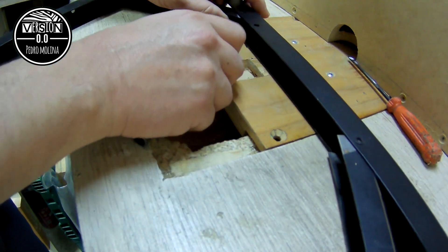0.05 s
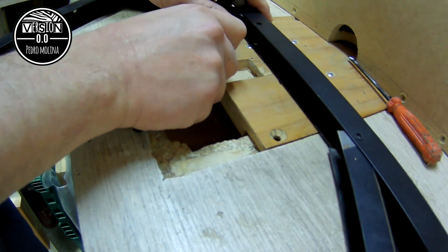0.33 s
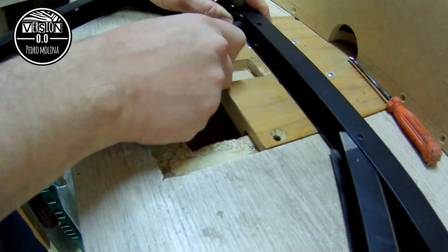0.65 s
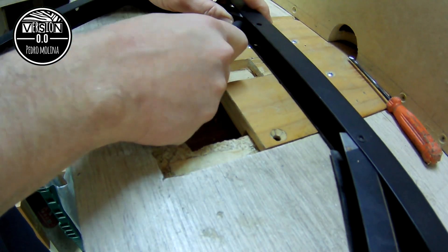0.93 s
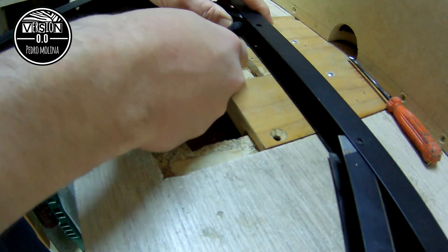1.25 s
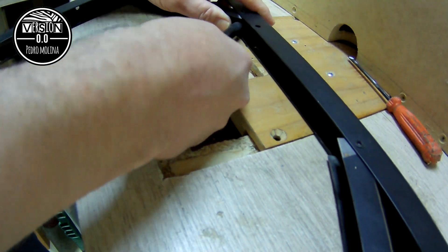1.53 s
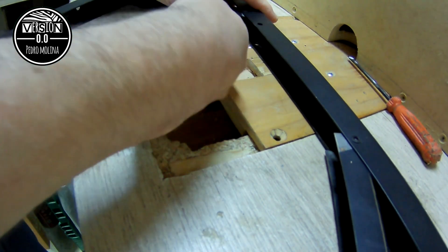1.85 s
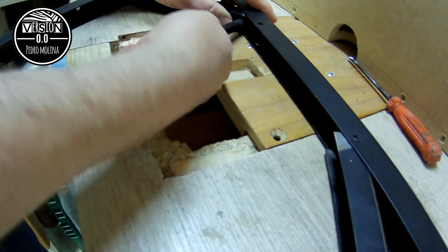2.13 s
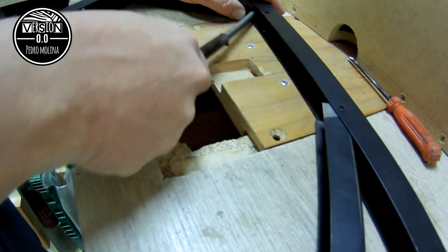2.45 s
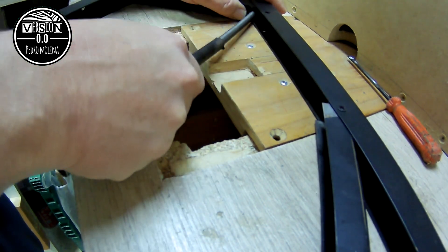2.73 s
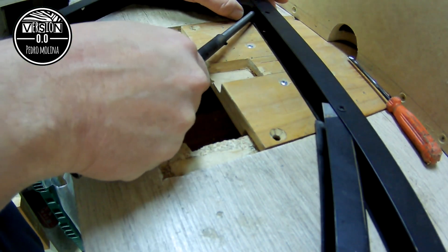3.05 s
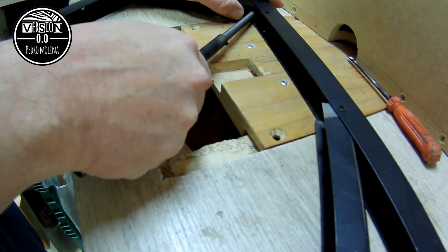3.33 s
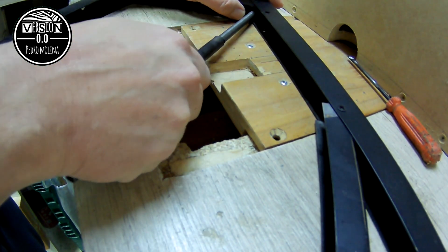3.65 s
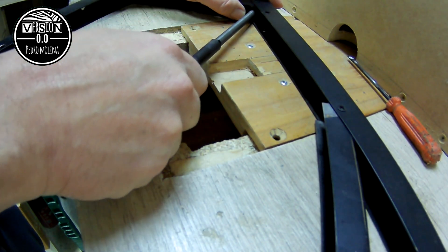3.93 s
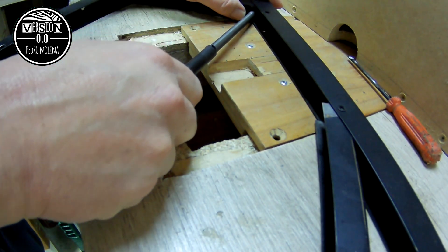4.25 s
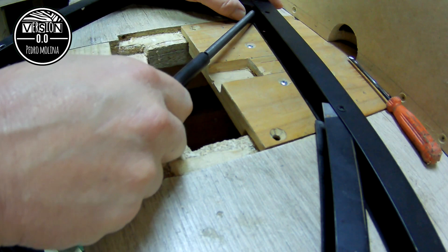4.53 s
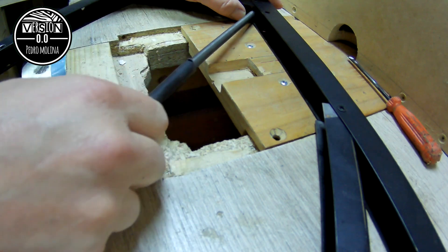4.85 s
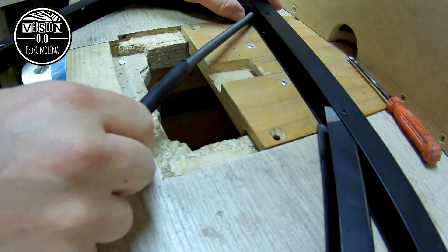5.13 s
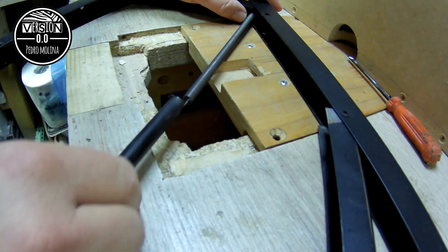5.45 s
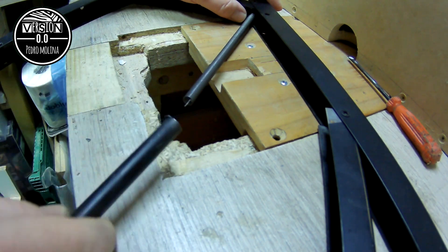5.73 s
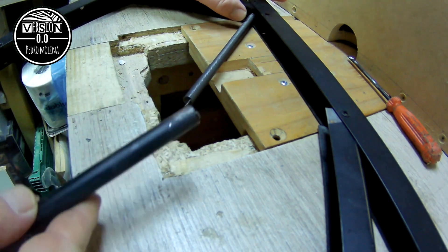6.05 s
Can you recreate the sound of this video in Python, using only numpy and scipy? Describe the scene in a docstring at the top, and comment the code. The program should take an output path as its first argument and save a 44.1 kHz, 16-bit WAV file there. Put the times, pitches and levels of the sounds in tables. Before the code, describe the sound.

The sound is close, in a small workshop with light hiss and a faint electronic buzz throughout. For the first two seconds, hands rub softly on a hollow wooden board, a tight metal joint creaks faintly, and a couple of light knocks follow. At about 2.3 seconds a steel tube slips with a squeaky scrape and, at 2.4, bangs against its stop. This is the loudest sound, with a wooden thud and a ringing steel rod. A smaller clank comes at 2.6, then light scuffs until 3.2. From 3.6 the tube is drawn off in a quiet, rapid judder that grows faster and louder, turning into a gritty rasp with small pings around 4.7 while the board groans low. Between 5.2 and 5.5 the tube's end scrapes and clatters loudly over the tip. The rod rings on and fades by 6 seconds.

```python
"""A small workshop: a steel tube is worked off a rod fixed to a wooden board.
Hands shift on the board; the tube slips with a scrape and bangs against its stop. It is then drawn off
in a stick-slip judder that turns into a rasp while the board groans. Its end clatters over the tip
and leaves the rod ringing. Room air and a faint electronic buzz lie underneath."""
import sys
import numpy as np
from scipy import signal
from scipy.fft import rfft, irfft
from scipy.io import wavfile

SR = 44100
rng = np.random.default_rng(int(sys.argv[2]) if len(sys.argv) > 2 else 0)


def master_out(mix):
    """Clip the mix to full scale and print it as 16-bit PCM to the path in sys.argv[1]."""
    frames = np.transpose(np.atleast_2d(mix))
    ceiling = np.clip(frames, -1, 1)
    pcm = np.round(ceiling * 32767).astype(np.int16)
    wavfile.write(sys.argv[1], SR, pcm)


N = 272752
TIME = np.arange(N) / SR
ROD_FREE_S = 4.0  # tube nearly off from here on
CUTOFF_HZ = 15400
HAND_ATTACK_S = 0.032

# steel-on-steel blows: start_s, clank_db, thud_db, crack_db, ring_db
KNOCKS = [(1.8366, -33, -30.5, -46, -56.5), (2.102, -39, -34, -42, -67.5), (2.334, -17, -32, -13, -65),
          (2.4191, 2.5, 3, -13, -19), (2.437, -38, -8, -37, -75), (2.5906, -11.5, -24, -18.5, -36),
          (2.667, -25, -48, -20.5, -54), (5.216, -34, -35, -22.5, -64.5), (5.3164, -6.5, -20.5, -15.5, -60),
          (5.351, -21, -52, -19.5, -70), (5.3934, -4.5, -14, -19.5, -63.5), (5.43, -29, -21.5, -20, -74.5),
          (5.484, -16, -23, -18, -50), (5.502, -22, -25.5, -29, -50), (5.519, -27, -24.5, -38, -33.5)]
# rod modes, lowest first: pitch_hz, held_db, free_db, held_t60_s
ROD_MODES = [(1325, -12, 0, 1.15), (1416, 0, -9, .58), (1464, -12, -6, .36), (1526, -14, -12, .65),
             (1698, -11.5, -15, 1.1), (1879, -16, -13, .7), (2153, -18, -3, .46), (2440, -11, -12, .6),
             (3289, -17, -7, .44)]
# tube wall squeal spectrum: freq_hz, gain_db
SQUEAL_COLOUR = [(1500, -31.5), (4000, -4.5), (7000, -14), (9000, 6), (10200, -10.5), (14000, -7.5),
                 (15500, -24.5)]


def from_db(db):
    """Decibels to gain."""
    return 10 ** (np.asarray(db) / 20)


def rms_one(x):
    """Scale to unit rms."""
    return x / np.sqrt(np.mean(x ** 2) + 1e-20)


def at_hz(points, hz):
    """Interpolate a table over log frequency."""
    freq_hz, value = np.transpose(points)
    return np.interp(np.log(hz + 1e-9), np.log(freq_hz), value)


def band(x, hz, kind):
    """Second-order Butterworth filter."""
    return signal.sosfilt(signal.butter(2, hz, kind, fs=SR, output="sos"), x + 1e-18)


def add(track, start_s, sound):
    """Mix a sound in at start_s."""
    at = max(0, round(start_s * SR))
    track[at:at + len(sound)] += sound[:N - at]


def coloured(x, colour, peaks=(), size=8192):
    """Minimum-phase filter from a broad colour and resonances; white noise keeps its power."""
    hz = np.arange(size // 2 + 1) * SR / size
    peaks_db = sum(db / (1 + (2 * (hz - centre_hz) / width_hz) ** 2) for centre_hz, width_hz, db in peaks)
    gain = rms_one(from_db(at_hz(colour, hz) + peaks_db))
    cepstrum = irfft(np.log(gain))
    cepstrum[1:size // 2] *= 2
    cepstrum[size // 2 + 1:] = 0
    return signal.fftconvolve(x, irfft(np.exp(rfft(cepstrum))))[:N]


def ring(force, hz, t60_s):
    """One mode: a unit click starts a decaying sine of height 1."""
    r, w = from_db(-60 / (t60_s * SR)), 2 * np.pi * hz / SR
    return signal.lfilter([0, np.sin(w)], [1, -2 * r * np.cos(w), r * r], force + 1e-18)


def burst(t60_s):
    """Decaying noise: many close modes dying together."""
    t = TIME[:int(1.5 * t60_s * SR) + 2]
    return rng.standard_normal(len(t)) * from_db(-60 * t / t60_s)


def grains(per_s, spread_db, flutter_db, flutter_hz):
    """Surface roughness: random micro-impacts under fluttering pressure; rms 1."""
    sizes = from_db(spread_db * np.minimum(rng.exponential(1, N), 4)) * rng.choice([-1, 1], N)
    pressure = rms_one(band(rng.standard_normal(N), flutter_hz, "low"))
    hits = rng.random(N) < per_s / SR
    return rms_one(sizes * hits * from_db(flutter_db * pressure))


def strokes(rows, attack_s=0.0038, release_db_per_s=423.5):
    """Strokes set in, swell or fade, then die as the hand stops; one gain curve per level column."""
    gains = 0
    for start_s, length_s, swell_db_per_s, *levels_db in rows:
        t = TIME - start_s
        shape_db = swell_db_per_s * np.clip(t, 0, length_s) - release_db_per_s * np.maximum(t - length_s, 0)
        shape = np.clip(t / attack_s, 0, 1) * from_db(shape_db)
        gains = gains + np.outer(from_db(levels_db), shape)
    return gains


def jerks(events, snap_t60_s, skid_t60_s, skid_db, rise_s=0.0003):
    """Force of sudden releases: each a snap with a short skid."""
    force = np.zeros(N)
    for start_s, db in events:
        for part in from_db(db) * burst(snap_t60_s), from_db(db + skid_db) * burst(skid_t60_s):
            add(force, start_s, part * np.minimum(TIME[:len(part)] / rise_s, 1))
    return force


def background(air_db=-54.5, ticks_per_s=30, whine_hz=8741, whine_db=-75):
    """Room air and hiss, with the faint ticking and whine of electronics."""
    # air and tick spectra: freq_hz, gain_db
    air_colour = [(25, 2.5), (300, -7), (600, -15), (1300, -22), (3000, -26), (4100, -25.5), (5200, -33.5),
                  (7300, -30.5), (8800, -26.5), (15500, -28.5)]
    tick_colour = [(1000, -25), (3600, 7), (5500, -12), (9500, -12), (11300, 10.5), (15500, -28)]
    ticks = np.zeros(N)
    for start_s in np.arange(0.0095, N / SR, 1 / ticks_per_s):
        add(ticks, start_s, from_db(-52) * burst(t60_s=0.012))
    air = from_db(air_db) * coloured(rng.standard_normal(N), air_colour)
    whine = from_db(whine_db) * np.sin(2 * np.pi * whine_hz * TIME)
    return air + coloured(ticks, tick_colour) + whine


def reverb(x, wet_db=-19, gap_s=0.019):
    """Diffuse workshop tail, shortest in the midrange."""
    # room decay: freq_hz, t60_s
    decay = [(80, 1), (1000, 0.11), (4000, 0.7), (14000, 0.44)]
    edges_hz, t, tail = np.geomspace(40, 16000, 10), TIME[:SR], 0
    for low_hz, high_hz in zip(edges_hz, edges_hz[1:]):
        noise = band(rng.standard_normal(SR), [low_hz, high_hz], "band")
        t60_s = at_hz(decay, np.sqrt(low_hz * high_hz))
        tail = tail + noise * from_db(-60 * t / t60_s) * (t > gap_s)
    return from_db(wet_db) * signal.fftconvolve(x, tail / np.linalg.norm(tail))[:N]


def twisting(whistle_hz=4150, whistle_db=-69, peak_s=0.67, half_width_s=0.6):
    """The dry joint creaks, then whistles faintly; nudges swell into the rod's lowest mode."""
    # twists and regrips, sharper under load: start_s, pitch_hz, level_db
    nudges = [(0.073, 1337, -49.5), (0.245, 1325, -51), (1.63, 1333, -53.5)]
    # first twist: start_s, length_s, swell_db_per_s, level_db
    first_twist = [(0, 0.082, -12, -38.5)]
    # joint creak: pitch_hz, gain_db, t60_s
    creak_modes = [(416, 2, 0.12), (1865, -10, 0.06)]
    rod, rod_t60_s = 0, ROD_MODES[0][-1]
    for start_s, hz, db in nudges:
        t = np.maximum(TIME - start_s, 0)
        envelope = np.tanh(t / HAND_ATTACK_S) * from_db(db - 60 * t / rod_t60_s)
        rod = rod + envelope * np.sin(2 * np.pi * hz * t)
    twist, = strokes(first_twist)
    rubbing = rng.standard_normal(N)
    creak = twist * rms_one(sum(from_db(db) * ring(rubbing, hz, t60_s) for hz, db, t60_s in creak_modes))
    whistle = from_db(whistle_db) * rms_one(ring(rubbing, whistle_hz, t60_s=0.022))
    return creak + rod + whistle * np.exp(-((TIME - peak_s) / half_width_s) ** 2)


def handling(rumble_gain):
    """Skin rubs tube and hollow board, the palm sounds the tube's air column, dragging shakes the board."""
    # palm slides: start_s, length_s, swell_db_per_s, level_db
    slides = [(1.715, 0.97, -24, -42), (2.73, 0.56, -28.5, -48), (5.06, 0.79, -9, -48)]
    # grip shifts: centre_s, length_s, rub_db, boom_db
    grips = [(0.039, 0.19, -37.5, -38), (0.23, 0.22, -47, -43.5), (0.644, 0.23, -51.5, -54.5),
             (1.372, 0.14, -51.5, -49), (1.69, 0.22, -44.5, -40.5), (1.87, 0.11, -44.5, -38),
             (2.108, 0.11, -44, -38.5), (2.29, 0.18, -49.5, -49), (2.847, 0.34, -50, -53),
             (3.162, 0.17, -56.5, -48)]
    # board boom, skin rub, air column and drag spectra: freq_hz, gain_db
    boom_colour = [(25, -14), (110, -8), (145, -1.5), (172, 2), (200, -8), (240, -15), (2000, -77.5)]
    rub_colour = [(150, -15.5), (270, 0.5), (420, -9), (650, -10.5), (1100, -18.5), (3500, -36.5),
                  (12000, -49)]
    column_colour = [(400, -20.5), (750, -14.5), (900, -18.5), (1085, -6), (1250, -30.5), (4000, -40)]
    drag_colour = [(75, -4.5), (110, -7), (170, 2.5), (220, -7.5), (290, -2.5), (650, -14), (2000, -35.5)]
    palm, = strokes(slides, HAND_ATTACK_S, release_db_per_s=90.5)
    boom, rub = np.zeros(N), np.zeros(N)
    for centre_s, length_s, rub_db, boom_db in grips:
        swell = np.exp(-8 * ((TIME - centre_s) / length_s) ** 2)
        rub += from_db(rub_db) * swell
        boom += from_db(boom_db) * swell
    texture = grains(per_s=9000, spread_db=1, flutter_db=2, flutter_hz=40)
    layers = [(boom, boom_colour), (rub, rub_colour), (palm, column_colour), (rumble_gain, drag_colour)]
    return sum(coloured(gain * texture, colour) for gain, colour in layers)


def groaning(pitch_hz=168, wander=0.089, rough_db=3, octave_db=-13):
    """The dragging tube drives one board mode, unsteady in pitch and level."""
    # groan envelope: time_s, level_db
    envelope = [(3.75, -51), (4.02, -60), (4.22, -49.5), (4.32, -40.5), (4.43, -45.5), (4.63, -35.5),
                (4.72, -42.5), (4.87, -34), (5.06, -51.5)]
    sway, tremor = (rms_one(band(noise, 25, "low")) for noise in rng.standard_normal((2, N)))
    phase = 2 * np.pi * np.cumsum(pitch_hz * (1 + wander * sway)) / SR
    tone = rms_one(np.sin(phase) + from_db(octave_db) * np.sin(2 * phase))
    level_db = np.interp(TIME, *np.transpose(envelope), left=-np.inf, right=-np.inf)
    return from_db(level_db + rough_db * (tremor - 0.5)) * tone


def board_rocking(bump_s=2.705, bump_db=-32):
    """Thuds shake the board; its lowest mode rocks once more as the hand eases off."""
    # board modes: pitch_hz, gain_db, t60_s
    modes = [(50, -26.5, 0.6), (165.5, -20, 0.36), (190.5, -22.5, 0.56)]
    thuds, bump = np.zeros(N), np.zeros(N)
    for start_s, _, thud_db, _, _ in KNOCKS:
        add(thuds, start_s, from_db([thud_db]))
    add(bump, bump_s, from_db([bump_db]))
    shaken = sum(from_db(db) * ring(thuds, hz, t60_s) for hz, db, t60_s in modes)
    lowest_hz, _, lowest_t60_s = modes[0]
    return shaken + ring(bump, lowest_hz, lowest_t60_s)


def grazing(low_hz=2100, high_hz=5500):
    """The tube grazes the rod: a short scuff that leaves its wall ringing."""
    # light contacts: start_s, ring_db, scuff_db
    grazes = [(1.836, -47, -33), (2.906, -62, -41), (3.105, -82, -45), (3.151, -54, -44)]
    # tube wall modes: pitch_hz, gain_db
    modes = [(1785, 1.5), (1879, -0.5), (2277, -3), (2466, -3), (2660, 0.5), (3289, -5)]
    clicks, scuffs = np.zeros(N), np.zeros(N)
    for start_s, ring_db, scuff_db in grazes:
        add(clicks, start_s, from_db([ring_db]))
        add(scuffs, start_s, from_db(scuff_db) * burst(t60_s=0.13))
    wall = sum(from_db(db) * ring(clicks, hz, t60_s=0.26) for hz, db in modes)
    return wall + band(band(scuffs, [low_hz, high_hz], "band"), high_hz, "low")


def squealing(gain, pressed_db=-48.5):
    """Sliding steel hisses at a light touch; the wall modes sing once it presses hard."""
    # wall resonances: centre_hz, width_hz, gain_db
    peaks = [(5000, 250, 10), (9270, 140, 5.9), (9520, 190, 7), (13300, 940, 6)]
    # hiss spectrum: freq_hz, gain_db
    hiss_colour = [(3000, -15), (9500, -2), (15000, -3.5)]
    chatter = gain * grains(per_s=3800, spread_db=3, flutter_db=3.5, flutter_hz=69.5)
    pressed = gain ** 2 / (gain ** 2 + from_db(pressed_db) ** 2)
    squeal = coloured(pressed * chatter, SQUEAL_COLOUR, peaks)
    return squeal + coloured((1 - pressed) * chatter, hiss_colour)


def rasping(gain):
    """Steel rasps in steel; burrs catch inside the tube with a grind and a ping."""
    # burr catches: start_s, grind_db, ping_db
    catches = [(2.359, -20.5, -35), (4.6745, -27.5, -28), (4.6914, -22.5, -27.5), (4.724, -32, -35),
               (4.75, -27, -29.5), (4.796, -27.5, -25.5), (4.8405, -30.5, -29), (4.859, -31.5, -32.5),
               (4.9029, -35, -37), (4.942, -42, -48), (5.2764, -33, -27)]
    # rasp and ping spectra: freq_hz, gain_db
    rasp_colour = [(100, -8), (400, -1), (2500, -2), (4000, -2), (7000, -13), (14000, -20), (15500, -29)]
    ping_colour = [(2000, -18.5), (6500, -2.5), (7100, -7.5), (8500, -2.5), (15000, -12.5)]
    # their resonances: centre_hz, width_hz, gain_db
    rasp_peaks = [(1782, 250, 15), (2270, 170, 8.5), (2466, 110, 11), (2700, 160, 10.5), (3450, 170, 6),
                  (4470, 300, 7)]
    ping_peaks = [(7690, 200, 21)]
    grit = gain * grains(per_s=4000, spread_db=1.5, flutter_db=3, flutter_hz=110)
    grinds = jerks([(s, db) for s, db, _ in catches], snap_t60_s=0.015, skid_t60_s=0.09, skid_db=-6)
    pings = jerks([(s, db) for s, _, db in catches], snap_t60_s=0.02, skid_t60_s=0.06, skid_db=-4)
    return coloured(grit + grinds, rasp_colour, rasp_peaks) + coloured(pings, ping_colour, ping_peaks)


def chirping(slips, chirp_db=-50.5, ref_slip_db=-44.5, detune=0.018):
    """Each slip chirps in the tube wall at one of three pitches, growing with its force squared."""
    # wall resonance: centre_hz, width_hz, gain_db
    peaks = [(9200, 340, 15.3)]
    (hz, width_hz, peak_db), = peaks
    steps = (-1, 0, 1)
    picks, chirps = rng.choice(steps, len(slips)), 0
    for step in steps:
        events = [(s, chirp_db + 2 * (db - ref_slip_db)) for s, db in np.array(slips)[picks == step]]
        force = jerks(events, snap_t60_s=0.026, skid_t60_s=0.072, skid_db=-5)
        chirps = chirps + coloured(force, SQUEAL_COLOUR, [(hz * (1 + detune * step), width_hz, peak_db)])
    return chirps


def judder(start_s=3.642, end_s=4.66, scatter_db=1.2, jitter=0.08):
    """Stick-slip of the long pull: even at first, then faster, harder and less even as it speeds up."""
    # slip rate: time_s, slips_per_s
    rate = [(4.09, 31.4), (4.284, 41.7), (4.55, 53)]
    # slip strength: time_s, level_db
    strength = [(3.64, -50), (3.8, -44.5), (4.22, -46), (4.54, -39.5), (4.66, -36.5)]
    # slip spectrum: freq_hz, gain_db
    colour = [(400, -4), (1000, 4.5), (4500, 1.5), (7000, -9), (13000, -17)]
    # slip resonances: centre_hz, width_hz, gain_db
    peaks = [(1053, 98, 15), (1690, 500, 10.6), (4837, 110, 8.7), (5120, 980, 13.2)]
    slips, time_s, uneven_from_s = [], start_s, rate[1][0]
    while time_s < end_s:
        level_db = np.interp(time_s, *np.transpose(strength)) + scatter_db * rng.standard_normal()
        slips.append((time_s, level_db))
        stretch = np.exp(jitter * (time_s > uneven_from_s) * rng.standard_normal())
        time_s += stretch / np.interp(time_s, *np.transpose(rate))
    force = jerks(slips, snap_t60_s=0.023, skid_t60_s=0.1, skid_db=-4.5, rise_s=0.0015)
    return coloured(force, colour, peaks) + chirping(slips)


def rod_ringing(friction, coupling_db=-55, heavy_db=-20, dulling_per_octave=0.35, free_t60_ratio=0.73):
    """Blows and friction ring the rod, heavy blows mostly low; its modes rebalance as the tube comes off."""
    free, rod = TIME > ROD_FREE_S, 0
    for hz, held_db, free_db, t60_s in ROD_MODES:
        octaves = np.log2(hz / ROD_MODES[0][0])
        force = from_db(coupling_db) * friction
        for start_s, _, thud_db, _, ring_db in KNOCKS:
            dulling_db = dulling_per_octave * octaves * max(0, thud_db - heavy_db)
            add(force, start_s, from_db([ring_db - dulling_db]))
        rod = rod + from_db(held_db) * ring(force * ~free, hz, t60_s)
        rod = rod + from_db(free_db) * ring(force * free, hz, t60_s * free_t60_ratio)
    return rod


def knocking(thud_hz=620, crack_hz=2800, sharp_db=-19):
    """Each blow is an impact and a clatter: thud of wood, clank and crack of steel; light ones are duller."""
    # tube end rattling over the tip: start_s, length_s, swell_db_per_s, level_db
    tip_rattle = [(5.402, 0.12, 5, -24.5)]
    # spectrum of the struck assembly: freq_hz, gain_db
    colour = [(30, -11), (120, -1.5), (700, -2.5), (1500, -2.5), (3000, 0.5), (4500, 0), (9000, -9.5),
              (15000, -29.5)]
    # its resonances: centre_hz, width_hz, held_db, free_db
    peaks = [(154, 48, 1, 11), (324, 32, 6, 11), (447, 44, 8.5, 6.5), (557, 66, 7.5, -2),
             (683, 76, 2.5, 8.5), (802, 68, 6, 8), (970, 45, 2, 12.5), (1143, 57, 4.5, 4.5),
             (1298, 45, 1.5, 7), (1620, 96, 7, 7), (1833, 140, 12.5, 11), (2120, 63, 7, 9),
             (2457, 150, 15.5, 6.5), (2769, 54, 4, 12)]
    rattle, = strokes(tip_rattle, attack_s=0.026, release_db_per_s=900.5)
    contacts = grains(per_s=810, spread_db=1.5, flutter_db=-0.5, flutter_hz=70.4)
    force = from_db(15.5) * rattle * band(contacts, [620, 1450], "band")
    for start_s, clank_db, thud_db, crack_db, _ in KNOCKS:
        blow = burst(t60_s=0.092)
        blow[:22] += 0.8 * np.hanning(22)  # 0.5 ms impact
        top_hz = CUTOFF_HZ * from_db(np.clip(crack_db - sharp_db, -10, 0))
        thud = from_db(thud_db + 15) * band(blow, thud_hz, "low")
        clank = from_db(clank_db + 7) * band(blow, [thud_hz, 0.62 * crack_hz], "band")
        crack = from_db(crack_db + 3) * band(band(blow, crack_hz, "high"), top_hz, "low")
        add(force, start_s, thud - clank + crack)
    free = TIME > ROD_FREE_S
    held = coloured(force * ~free, colour, [(hz, width_hz, db) for hz, width_hz, db, _ in peaks])
    loose = coloured(force * free, colour, [(hz, width_hz, db) for hz, width_hz, _, db in peaks])
    return from_db(-9) * (held + loose)


def scene():
    """Tube, rod and board close by in the workshop; mono."""
    # pushes and pulls of the tube: start_s, length_s, swell_db_per_s, rasp_db, squeal_db, rumble_db
    moves = [(0, 0.5, -32.5, -54, -49.5, -65), (2.334, 0.081, 45, -29, -62, -32),
             (2.358, 0.042, 31, -30, -24.5, -31), (2.42, 0.091, -45.5, -35.5, -37.5, -26.5),
             (2.6, 0.55, -18, -53, -51, -51.5), (3.6, 1.2, 21.5, -73, -72.5, -67.5),
             (4.676, 0.03, -3.5, -32, -37, -50.5), (4.72, 0.17, -27, -37, -36, -34.5),
             (4.91, 0.06, -65.5, -52.5, -55, -42), (5.217, 0.076, 75, -36.5, -42, -38),
             (5.488, 0.029, -100, -32, -34, -30)]
    rasp_gain, squeal_gain, rumble_gain = strokes(moves)
    friction = rasping(rasp_gain) + squealing(squeal_gain) + judder()
    steel = knocking() + grazing() + friction + rod_ringing(friction)
    work = steel + board_rocking() + handling(rumble_gain) + groaning() + twisting()
    return (work + reverb(work) + background())[None]


def record(dry):
    """Soft overload on the hardest bang, then a steep low-pass."""
    ceiling = 0.72
    clipped = dry / (1 + (dry / ceiling) ** 6) ** (1 / 6)
    return signal.sosfilt(signal.ellip(10, 0.1, 80, CUTOFF_HZ, fs=SR, output="sos"), clipped)


dry = scene()
out = record(dry)
master_out(out)
```